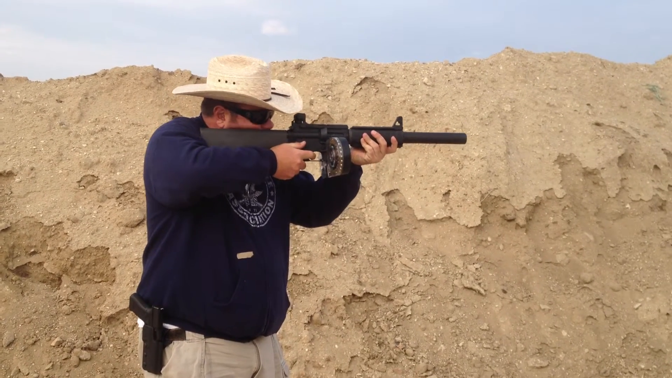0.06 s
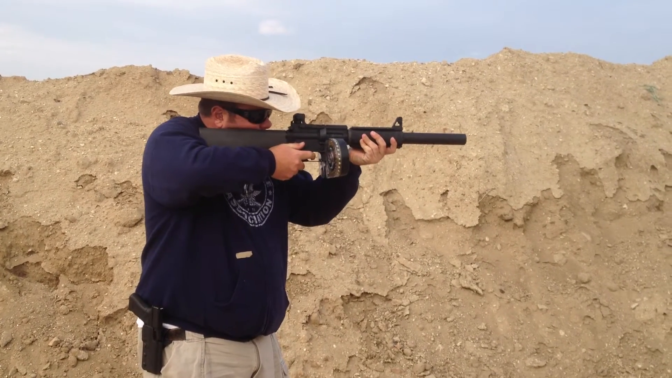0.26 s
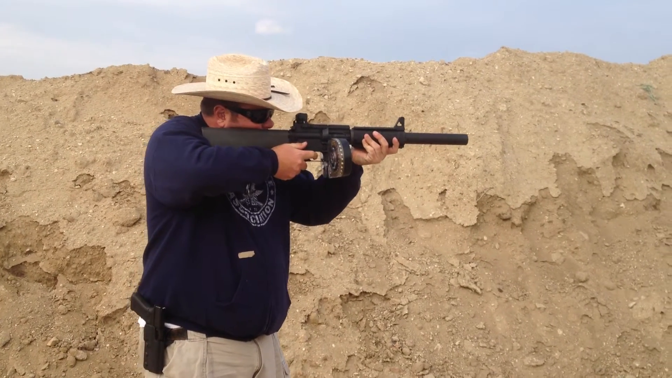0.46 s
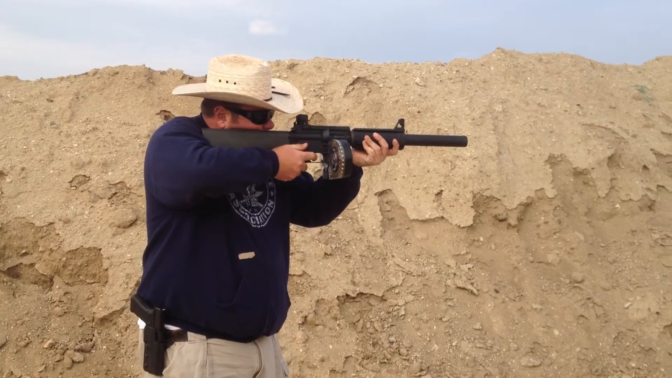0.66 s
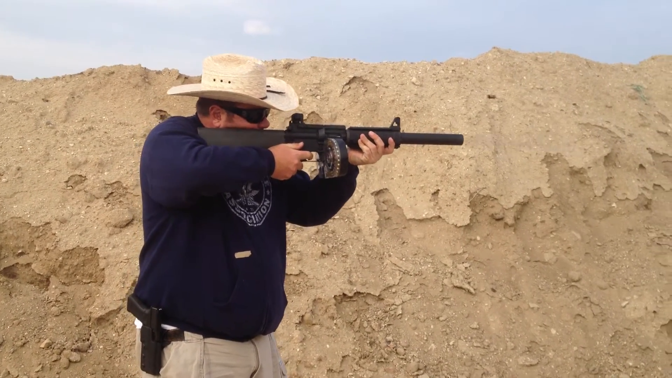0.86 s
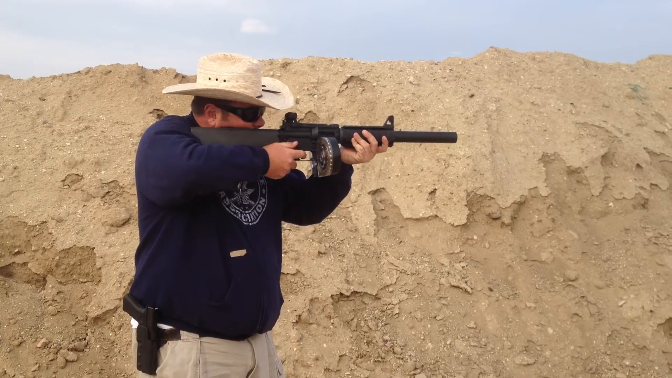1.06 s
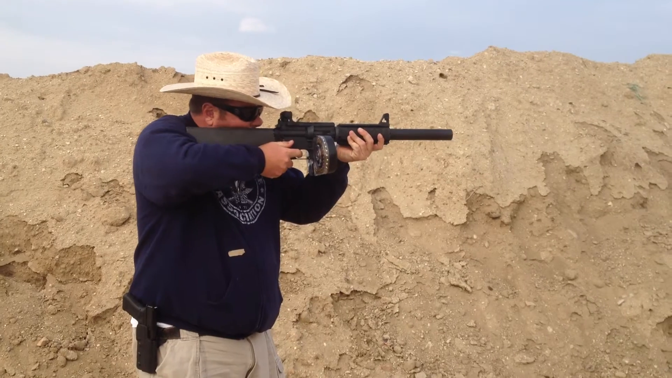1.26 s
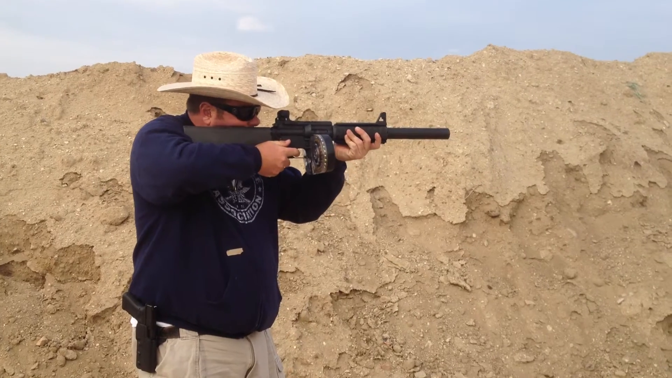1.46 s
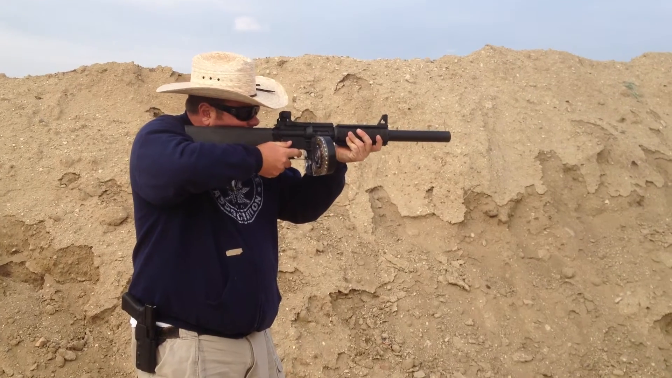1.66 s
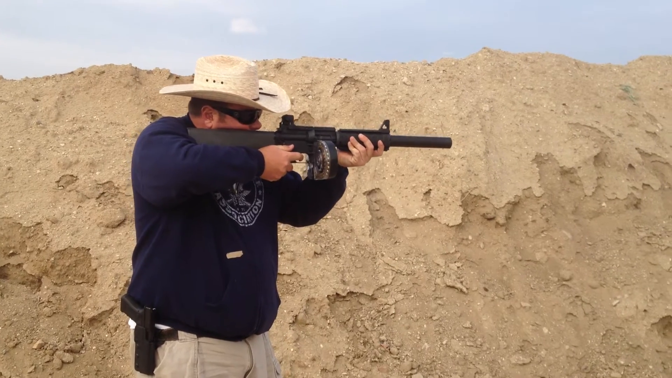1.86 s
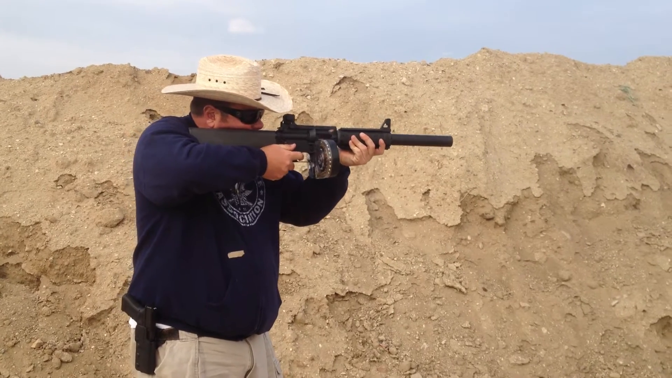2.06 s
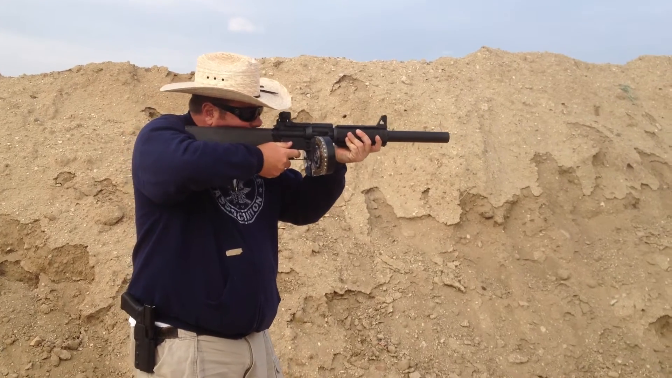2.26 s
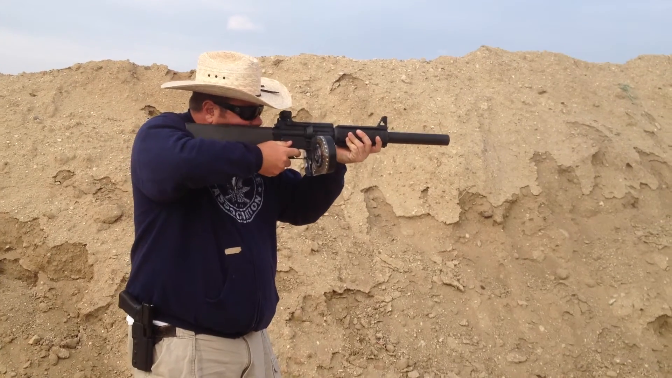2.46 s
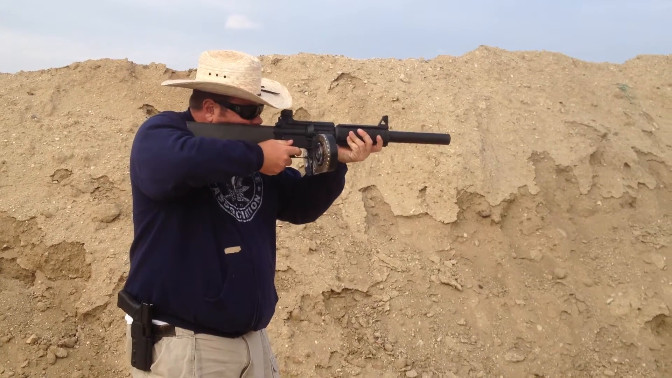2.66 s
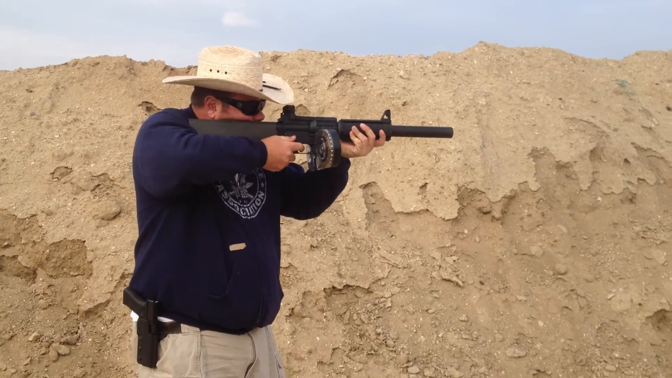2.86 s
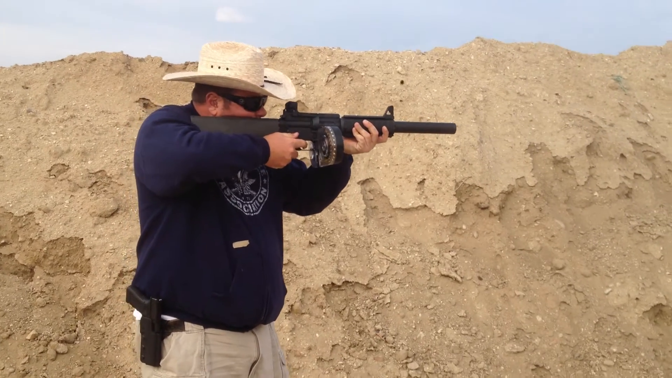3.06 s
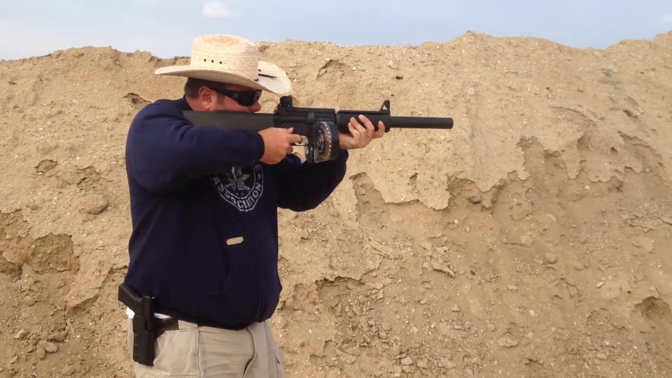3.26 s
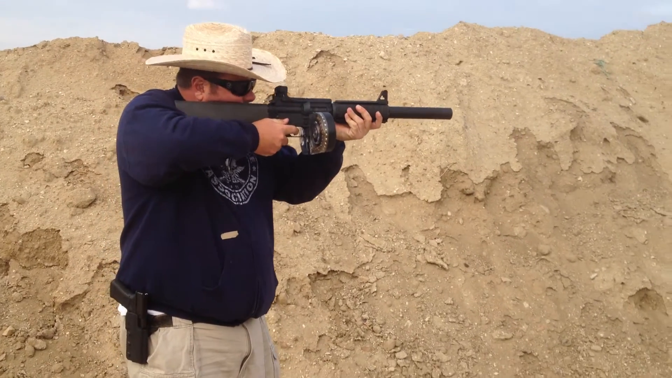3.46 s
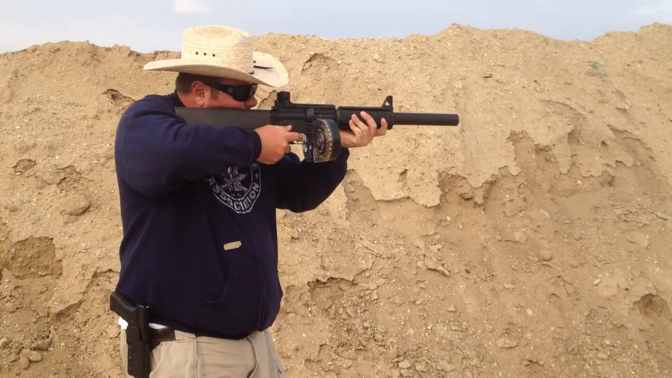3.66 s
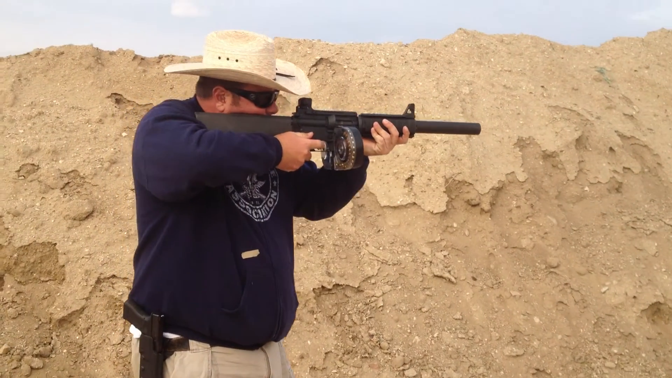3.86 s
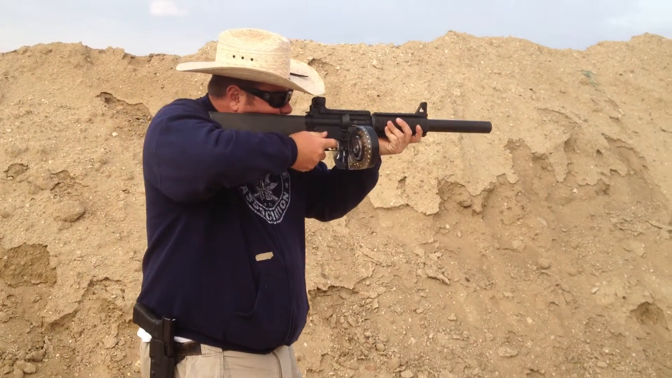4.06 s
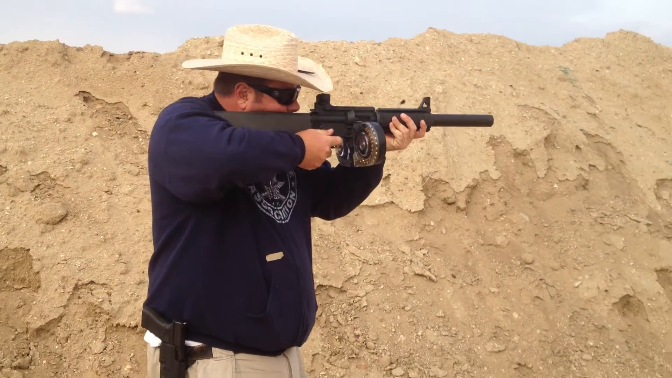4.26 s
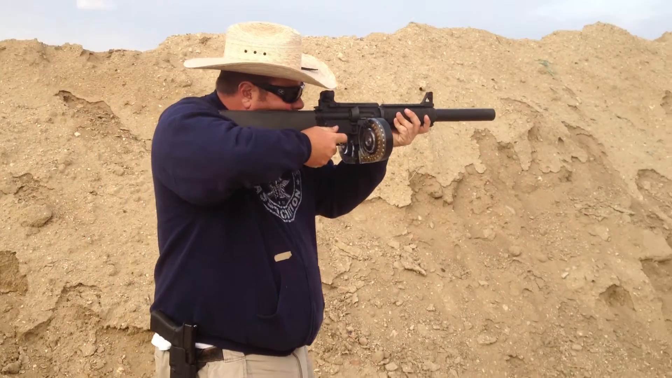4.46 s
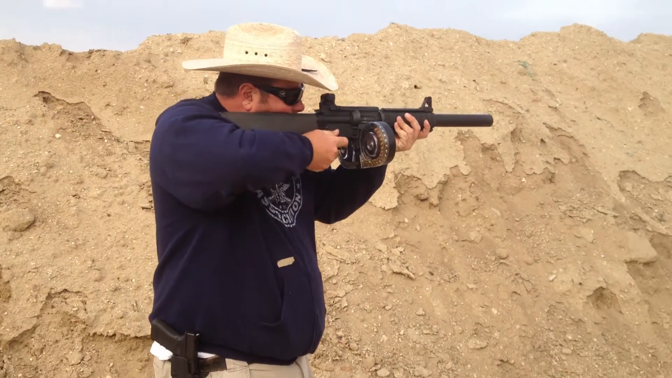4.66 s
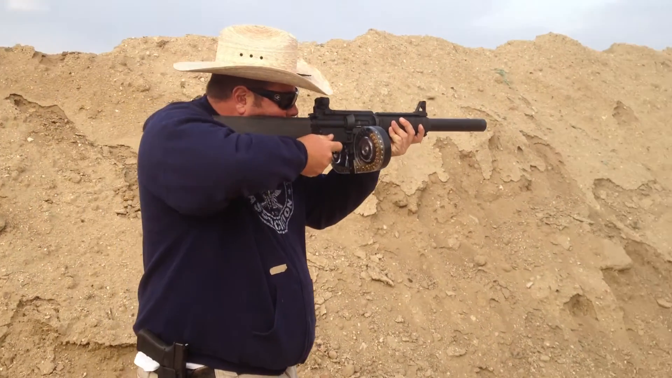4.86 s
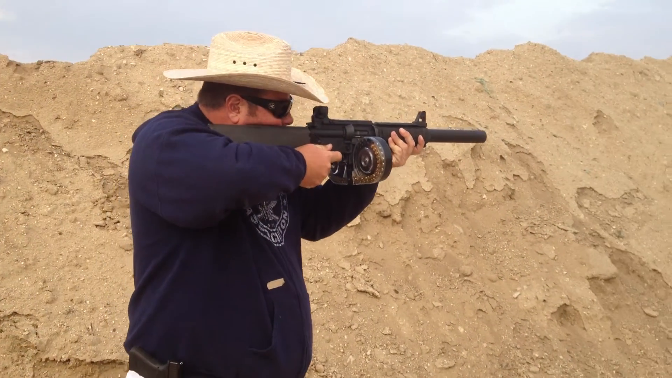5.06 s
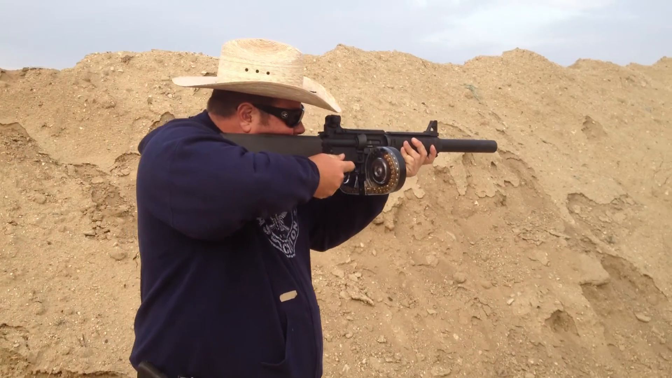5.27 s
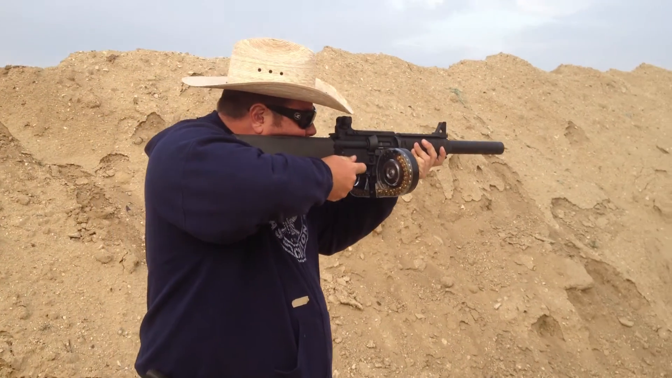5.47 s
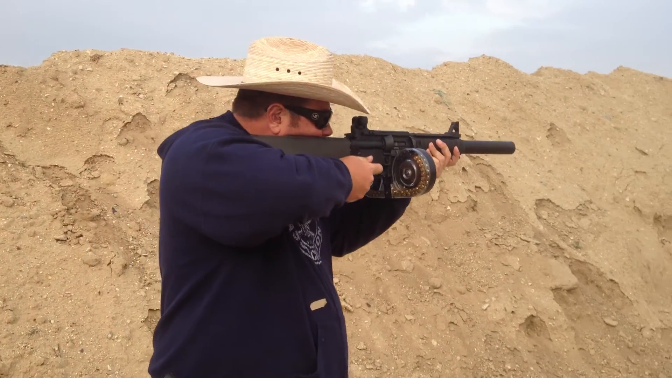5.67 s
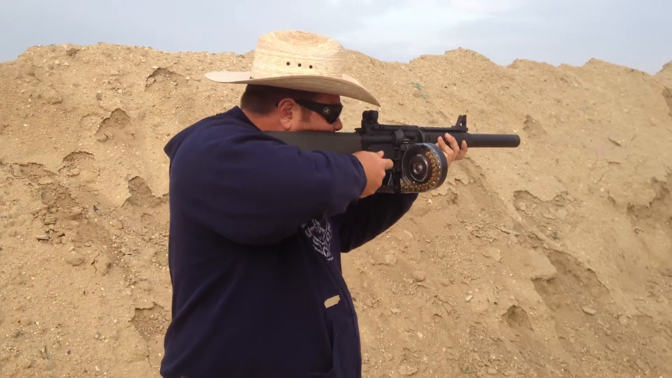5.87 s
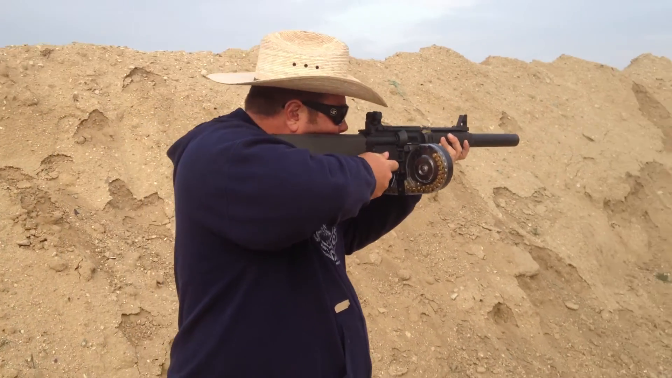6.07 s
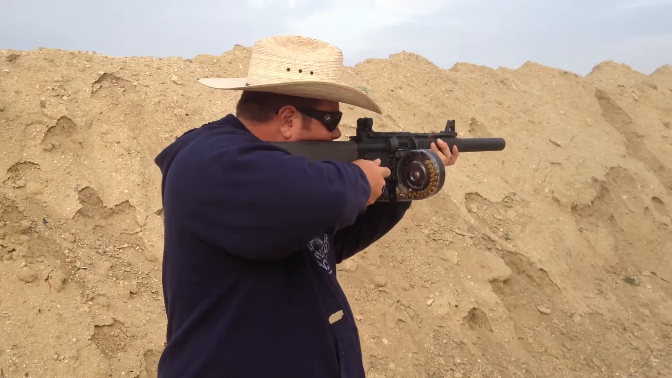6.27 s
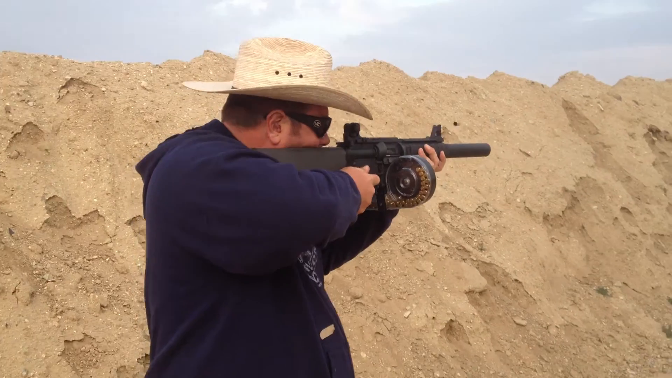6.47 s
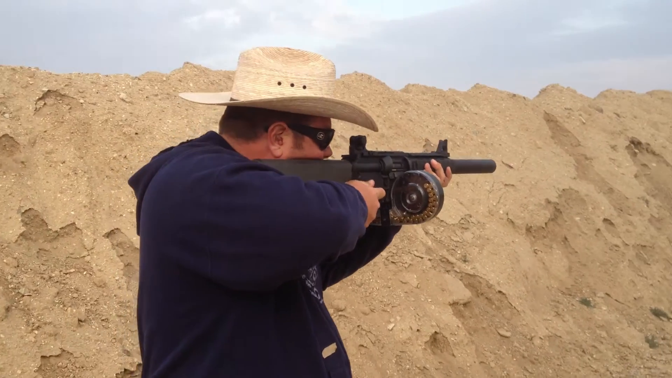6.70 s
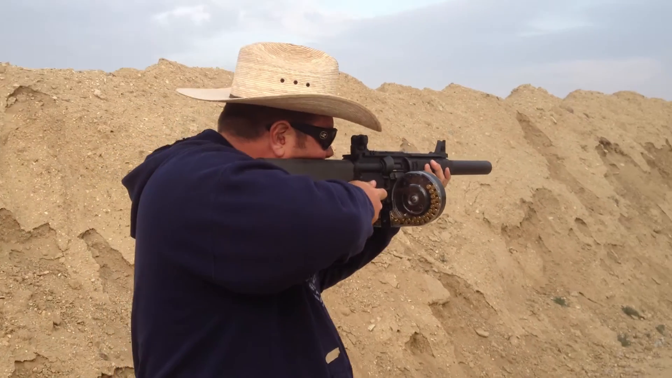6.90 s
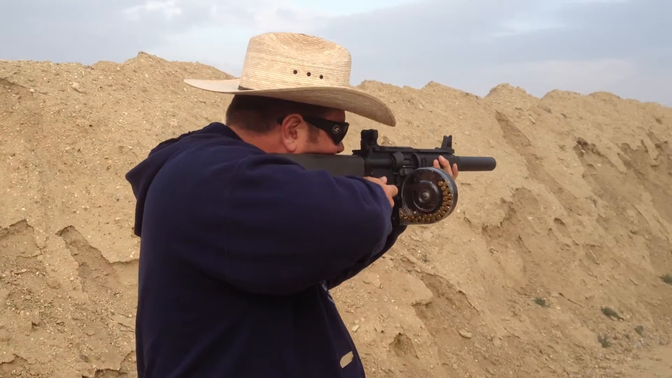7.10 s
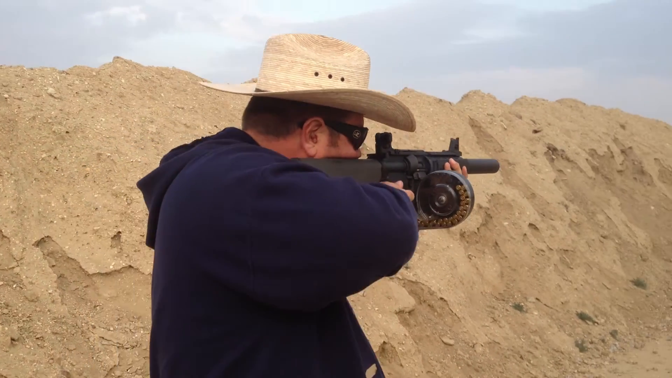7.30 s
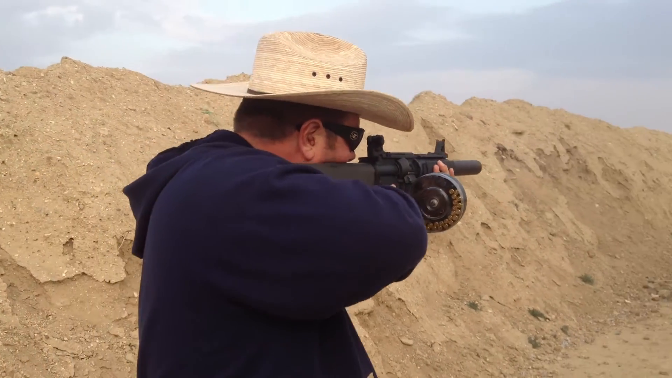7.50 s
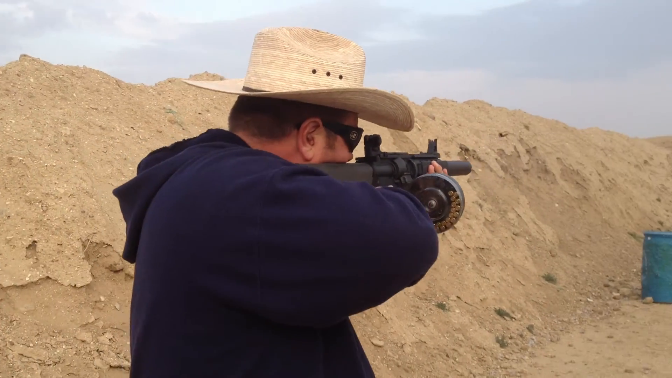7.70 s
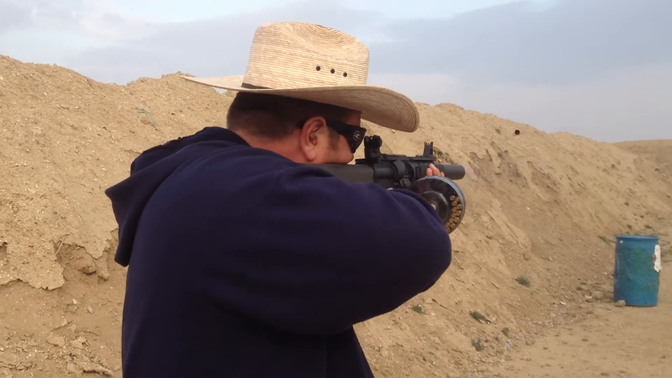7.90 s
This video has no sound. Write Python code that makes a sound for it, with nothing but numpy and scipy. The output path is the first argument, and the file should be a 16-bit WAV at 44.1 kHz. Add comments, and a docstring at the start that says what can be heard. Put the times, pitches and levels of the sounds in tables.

```python
"""Wind rumbles and an earlier shot's echoes die away; then a suppressed carbine fires strings of shots in an
earth-banked pit, heard from a point that moves round behind it. Each shot: hammer (struck steel modes), hissing blast
(decaying noise bands), the pop and its bank echoes (spread tone bursts), bolt home and settling, and bullet smacks.
In the pauses brass cases tinkle (ticks and beating tones), the ground knocks, boots scuff (swelling noise), sand
blows and far ground answers with a long grainy tail."""
import sys
import numpy as np
from scipy import signal
from scipy.io import wavfile
from scipy.ndimage import uniform_filter1d

SR = 44100
rng = np.random.default_rng(int(sys.argv[2]) if len(sys.argv) > 2 else 0)


def master(y):
    """Save y as 16-bit WAV."""
    cut = np.clip(np.atleast_2d(y).T, -1, 1)
    pcm = np.round(cut * 32767)  # scale
    wavfile.write(sys.argv[1], SR, pcm.astype(np.int16))


def nominal_scale(level):
    """Amplitude ratio for a level in decibels (scalar or array-like)."""
    x = np.asarray(level, float) / 20
    return 10 ** x


N = 350154
TIME = np.arange(N) / SR
BLAST_DB = -7.5  # reference level of every shot
EARLIER_SHOT_S = -.1635  # only its late echoes are still arriving

# the listening point's path: (time [s], share of the way behind [0 to about 1])
WALK = [(0, 0), (3, .15), (3.6, .3), (4.3, .55), (5.7, .85), (6.5, 1), (8, 1.03)]
# bolt and thump are loudest about two thirds of the way behind, settling from fully behind:
# (share of the way behind, relative bolt level [dB], relative settling level [dB], mean thump level [dB])
PORT = [(0, -19.5, -39, -28.5), (.2, -18.5, -42.5, -23), (.65, -17, -37.5, -22), (1.03, -20.5, -36, -29)]


def taps(s, db):
    """Impulse excitation: unit blows of the given levels at the given moments."""
    at = np.round(np.asarray(s) * SR).astype(int)
    return np.bincount(at, nominal_scale(db), N + SR)[:N]


def fade(x, t60):
    """Exponential decay: every blow leaves a tail falling 60 dB in t60 seconds."""
    return signal.lfilter([1], [1, -.001 ** (1 / (t60 * SR))], x)


def band(x, hz, width):
    """Resonance: a second-order peak of gain 1 at the centre."""
    return signal.lfilter(*signal.iirpeak(hz, hz / width, SR), x)


def above(x, hz):
    """High-pass filtering: the low end falls by 12 dB per octave."""
    return signal.sosfilt(signal.butter(2, hz, "high", fs=SR, output="sos"), x)


def ring(blows, modes):
    """Modal superposition: blows set off modes (frequency [Hz], relative level [dB], t60 [s])."""
    out = 0
    for hz, db, t60 in modes:
        width = np.log(1000) / np.pi / t60  # the faster the decay, the broader the resonance
        out = out + nominal_scale(db) * np.sqrt(t60 * SR) * band(blows, hz, width)
    return out


def hiss(tone):
    """Filtered turbulence: noise through twice-applied resonances (Hz, width Hz, relative dB), rms 1."""
    x = 0
    for hz, width, db in tone:
        noise = band(band(rng.standard_normal(N), hz, width), hz, width)
        x = x + nominal_scale(db) * np.sqrt(SR / width) * noise
    return x / np.std(x)


def wander(rate):
    """Random modulation: a new random value about rate times a second, joined by straight lines."""
    k = int(SR / rate)
    return uniform_filter1d(np.repeat(rng.standard_normal(N // k + 1), k), k)[:N]


def flicker(rate, depth_db):
    """Amplitude modulation by a wandering level."""
    return nominal_scale(depth_db * wander(rate))


def share_behind(s):
    """Geometry of the listening point: its share of the way behind the gun at given moments."""
    return np.interp(s, *np.transpose(WALK))


def add(out, s, burst):
    """Linear superposition: mix in a short burst centred on a moment."""
    at = int(s * SR) - len(burst) // 2 + np.arange(len(burst))
    inside = (at >= 0) & (at < N)
    out[at[inside]] += burst[inside]


def scatter(s, db):
    """Diffuse reflection: rough banks return each shot as a wash of noise."""
    # envelope of the wash: (delay after the shot [ms], relative level [dB])
    wash_decay = [(0, -27), (60, -22.5), (100, -36), (150, -44.5), (185, -42), (215, -40), (240, -50.5),
                  (270, -72), (400, -67), (600, -83)]
    # its colour: (frequency [Hz], width [Hz], relative level [dB])
    wash_tone = [(395, 450, -7), (880, 1000, -5), (1403, 410, 0.5), (2570, 500, -4.5), (2010, 2000, -1),
                 (3830, 990, -10.5), (7840, 5500, -9), (13000, 4000, -20)]
    ms, level_db = np.transpose(wash_decay)
    shape = nominal_scale(np.interp(np.arange(int(.6 * SR)) * 1000 / SR, ms, level_db))
    wash = signal.fftconvolve(taps(s, db), shape)[:N].clip(0)
    earlier_db = np.interp(1000 * (TIME - EARLIER_SHOT_S), ms, level_db, right=-200)
    wash = wash + nominal_scale(BLAST_DB + earlier_db)
    return wash * flicker(150, 4.3) * hiss(wash_tone) * nominal_scale(5.5)


def air(s, db):
    """Wind turbulence and reverberation: wind rumbles and blows sand; far ground returns a grainy tail."""
    # rumble, one list for each pause: (time [s], level [dB]);
    # it follows the wind, but its spike near 1.87 s is a short knock on the ground
    rumble_levels = [
        [(0.3, -57.5), (0.344, -70), (0.35, -66), (0.596, -67), (0.614, -61), (0.69, -54.5)],
        [(1.72, -62), (1.81, -70), (1.842, -73.5), (1.868, -61.5), (1.892, -74), (2.05, -68)],
        [(3.8, -49), (4.006, -47.5), (4.026, -68), (4.06, -41), (4.154, -47), (4.22, -42)],
        [(5.1, -49), (5.244, -51), (5.28, -47), (5.41, -52), (5.476, -45), (5.68, -47)],
        [(6.72, -57), (6.732, -76), (6.778, -55.5), (6.948, -57), (7.076, -51), (7.23, -50.5)],
    ]
    # wind and blown grit: (frequency [Hz], width [Hz], relative level [dB])
    wind_tone = [(133, 63, -0.5), (183, 150, 6), (263, 130, -8.5), (397, 190, -21)]
    grit_tone = [(680, 4400, 2), (2150, 470, -6.5), (3830, 290, -9.5)]
    # far echo: (frequency [Hz], width [Hz], relative level [dB])
    far_tone = [(600, 1200, -1), (1400, 550, -4), (2400, 700, 0), (3800, 1400, -10)]
    rumble_db = np.interp(TIME, *np.concatenate(rumble_levels).T)
    # the deep part grows faster than the rumble, the sand more slowly
    deep = nominal_scale(-67.5 + 1.4 * (rumble_db + 48.5))
    rumble = flicker(35, 2.0) * (nominal_scale(rumble_db) * hiss(wind_tone) + deep * hiss([(59.7, 41, 0)]))
    sand = nominal_scale(-69.5 + .5 * (rumble_db + 49))
    far_t60_s = 1.73
    far_power = fade(taps(s, 2 * (db - 49.5)), far_t60_s / 2)  # powers add
    far = np.sqrt(far_power.clip(0))
    coarse = sand * hiss(grit_tone) + far * flicker(8.1, 3.4) * hiss(far_tone)
    fine = np.hypot(nominal_scale(-15.5) * sand, nominal_scale(-13.5) * far)  # treble of both
    grains = nominal_scale(2.0) * coarse + nominal_scale(2.5) * fine * hiss([(7000, 4000, 1), (12500, 4000, -3.5)])
    return rumble + flicker(130, 3.5) * flicker(54, 1.5) * grains


def pop(spread_ms, db, tilt, bright_db):
    """Time dispersion: a pop spread into swelling tones, the lowest last, and a rough treble."""
    # tones: (frequency [Hz], lateness [spreads], length [spreads], relative level [dB])
    pop_tones = [(380, 2.0, 1.2, -10), (790, 1.376, 0.73, -7.5), (1060, .6, 1.2, -11),
                 (1451, -0.036, 0.68, -2), (1900, -.2, 0.38, -13.5), (2362, 0, 1.05, -17),
                 (3260, -.2, 0.31, -15), (3930, -.2, 0.23, -21)]
    ms = np.arange(-400, 400) * 1000 / SR
    treble = band(rng.standard_normal(len(ms)), 6000, 9000)
    out = nominal_scale(db - 24.5 + 2 * tilt) * np.exp(-.5 * (ms / spread_ms) ** 2) * treble
    for hz, late, longer, tone_db in pop_tones:
        size, pitch = rng.standard_normal(2)
        t = ms - late * spread_ms
        swell = np.exp(-.5 * (t / (longer * spread_ms)) ** 2)
        lift_db = bright_db * np.exp(-(np.log2(hz / 2400) / 0.34) ** 2)
        tilt_db = tilt * np.log2(hz / 1400)  # dB per octave
        tone = np.cos(2 * np.pi * hz * (1 + .03 * pitch) * t / 1000 + .5 * size)
        out += nominal_scale(db + tone_db + lift_db + tilt_db + 2.0 * size) * swell * tone
    return out


def pops_and_echoes(s, db):
    """Discrete reflection: direct pop, its ground bounce, a second burst of gas, then the bank echoes."""
    # these bursts in that order: (delay from the side [ms], delay from behind [ms])
    burst_ms = [(.1, .1), (1.4, 1.4), (5.2, 5.6), (12, 18), (29, 32), (43.6, 47), (56.3, 60.4),
                (86.5, 90.6), (166.9, 170.7), (302, 306)]
    # the same bursts: (spread [ms], treble tilt [dB per octave], relative level from the side [dB],
    # relative level from behind [dB], full gain of the bright tone [dB])
    bursts = [(.3, 2.5, -0.5, -6, -1.5), (0.27, 3.5, -6, -7.5, -3), (1.2, 6, -5.5, -11.5, 5.5),
              (1.2, 4, -15.5, -9.5, 14.5), (1.1, 2, -10, -16.5, 3.5), (1.3, 1.5, -9, -10, -6),
              (0.95, 3.55, -7, -8, 5), (1.25, -7, -25, -26, 26.5), (0.95, 2.5, -14, -16.5, 15),
              (0.81, -4.5, -44, -43, -1)]
    # course of the bright tone, which rises until 6.5 s, then sinks: (time [s], share of its full gain)
    bright_share = [(0, 0), (3.4, 0.057), (3.8, 0.38), (4.6, 0.56), (5.0, 0.64), (5.9, .75), (6.5, 0.91),
                    (7.3, 0.68), (7.9, 0.7)]
    # a late dull echo, heard when no shot covers it: (time [s], relative level [dB])
    late_echoes = [(0.252, -22.5), (1.676, -24.5), (3.783, -26.5), (5.067, -32), (5.076, -26), (6.698, -24)]
    out = np.zeros(N)
    for t, d, behind, bright in zip(s, db, share_behind(s), np.interp(s, *np.transpose(bright_share))):
        for (side_ms, rear_ms), (spread, tilt, side_db, rear_db, bright_db) in zip(burst_ms, bursts):
            level_db = d + 8 + side_db + behind * (rear_db - side_db)
            delay_ms = side_ms + behind * (rear_ms - side_ms)
            add(out, t + delay_ms / 1000, pop(spread, level_db, tilt, bright * bright_db))
    for t, d in late_echoes:
        add(out, t + 0.00048, pop(0.72, d - 3, -5.2, 0))
    return out


def smacks():
    """Impact: the bullet strikes the far bank with a bright resonant slap and a decaying spray of dirt."""
    # smacks not hidden by the next shot: (time [s], relative level [dB])
    strikes = [(0.018, -18.5), (0.2107, -19.5), (1.445, -26), (1.634, -18.5), (2.99, -24), (3.554, -24.5),
               (3.733, -28), (3.7457, -22.5), (4.65, -24), (4.8427, -22), (5.0411, -17), (5.9154, -14.5),
               (6.2863, -15), (6.6546, -20.5), (7.4625, -27), (7.6831, -21), (7.8794, -17)]
    # (frequency [Hz], width [Hz], relative level [dB])
    smack_tone = [(2050, 1400, 7), (3900, 730, 3.5), (7540, 2400, 5), (12000, 3900, -4.5)]
    blows = taps(*np.transpose(strikes))
    slap = sum(nominal_scale(db + 9.5) * band(band(blows, hz, w), hz, w) for hz, w, db in smack_tone)
    spray = nominal_scale(5) * fade(blows, 0.0078) + nominal_scale(-23.5) * fade(blows, 0.12)
    return slap + spray * hiss(smack_tone)


def action(s, home_ms, settle_ms):
    """Modal excitation: hammer, firing, bolt home and rebound each rattle the same steel for a few ms."""
    # receiver and bolt: (frequency [Hz], relative level [dB], t60 [s])
    steel = [(860, -9, .014), (1590, -9, .014), (2550, -4, .008), (3250, -2.5, .006), (4050, -4, .01),
             (7640, -10, .015), (8500, -10, .012), (12700, -12, .01), (13900, -12, .012)]
    # thin tube on the muzzle: (frequency [Hz], relative level [dB], t60 [s])
    can = [(6740, -18, .26), (6975, -13, .22), (7080, -23, 0.2)]
    way, bolt_level, settle_level, _ = np.transpose(PORT)
    bolt_db = np.interp(share_behind(s), way, bolt_level) + 2.25 * rng.standard_normal(len(s))
    settle_db = np.interp(share_behind(s), way, settle_level) + 2 * rng.standard_normal(len(s))
    db = np.full(len(s), BLAST_DB)
    hammer = fade(taps(s - .0055, db - 22.5), .012)
    firing = fade(taps(s, db - 8.0), 0.011)
    home = fade(taps(s + home_ms / 1000, bolt_db), 0.041)
    settle = fade(taps(s + settle_ms / 1000, settle_db), 0.016)
    noise = rng.standard_normal(N) * flicker(700, 0.81)
    rattle = (hammer + firing + nominal_scale(8.5) * home + nominal_scale(12.5) * settle) * noise
    # the shooter's body hides the tube from behind
    tube = nominal_scale(-4 - 12 * share_behind(TIME)) * ring(home * noise, can)
    return nominal_scale(-15.0) * ring(rattle, steel) + nominal_scale(-8) * band(rattle, 12000, 9000) + tube


def gas(s, db):
    """Jet turbulence: gas roars out of can and port, full flow for some ms, then a sputtering fade by band."""
    # escaping gas: (frequency [Hz], width [Hz], relative level from the side [dB], t60 [s])
    gas_bands = [(179, 57, -23, 0.11), (262, 130, -14.5, 0.096), (552, 350, -5, 0.1), (817, 290, -14, 0.32),
                 (1690, 690, -10.5, 0.16), (2478, 700, -5, 0.14), (3180, 720, -8.5, 0.17),
                 (3980, 1300, -6.5, 0.12), (6200, 4500, -9, 0.13), (7820, 2600, -11.5, 0.2),
                 (10960, 2000, -27, 0.28), (13060, 4100, -10.5, .16)]
    # change when heard from behind: (frequency [Hz], level change [dB])
    gas_behind = [(190, 5.5), (380, -6.5), (700, 1), (1400, 3.5), (2500, 0), (8000, 1.5), (14000, 1)]
    blows = uniform_filter1d(taps(s, db), size=50, origin=-5)  # pressure builds within about a ms
    full_flow = signal.windows.tukey(640, .3)[320:]
    rush = nominal_scale(-8.5) * signal.fftconvolve(blows, full_flow)[:N].clip(0)
    sputter = flicker(600, 2)
    behind = share_behind(TIME)
    at_hz, change_db = np.transpose(gas_behind)
    out = 0
    for hz, width, level_db, t60 in gas_bands:
        turn_db = behind * np.interp(np.log(hz), np.log(at_hz), change_db)
        out = out + nominal_scale(level_db + turn_db) * (fade(blows, t60) + rush) * hiss([(hz, width, 0)])
    return sputter * out


def thump(s):
    """Monopole pulse: the port vents a one-sided push of air at each shot, then a short low swing."""
    way, *_, level_db = np.transpose(PORT)
    db = np.interp(share_behind(s), way, level_db) + 2 * rng.standard_normal(len(s))
    t = TIME[:SR // 5]
    push_ms, swing_after_ms, swing_hz, swing_t60_s = 9.7, 7, 140, 0.024
    late = (t - swing_after_ms / 1000).clip(0)
    push = np.sin(np.pi * (1000 * t / push_ms).clip(0, 1)) ** 2
    swing = nominal_scale(-5.5 - 60 * late / swing_t60_s) * np.sin(-2 * np.pi * swing_hz * late)
    return signal.fftconvolve(taps(s, db), push + swing)[:N]


def cases():
    """Impact and beating: a tick on the dirt, then spinning brass sings two close, wavering tones."""
    # ticks and rings, of landing cases except for a faint stray tick at 6.72 s:
    # (time [s], relative low tick level [dB], relative high tick level [dB], ring level [dB])
    ticks = [(0.409, -33.5, -45, -52.5), (0.5825, -45, -39, -55.5), (0.689, -51.5, -55, -56.5),
             (1.6644, -24, -43.5, -54), (1.857, -32, -45, -46.5), (1.973, -44.5, -37.5, -68.5),
             (2.061, -43, -54, -60.5), (3.76, -38, -37, -58), (3.875, -62, -58, -65),
             (3.9394, -43, -38.5, -59), (4.1344, -32, -38.5, -52), (5.2277, -46, -49, -56),
             (5.308, -55, -59, -67), (5.3258, -45, -54, -72), (5.354, -45, -43.5, -52),
             (5.4165, -46, -49.5, -75), (5.443, -27.5, -39, -56), (5.4628, -61, -45, -64),
             (5.5538, -16.5, -40, -58.5), (5.609, -44, -45, -63), (5.6186, -42, -46, -51.5),
             (6.7224, -43, -45, -60), (6.8277, -39, -46, -56), (7.0167, -48, -56, -65.5),
             (7.037, -34.5, -52, -63), (7.228, -38, -47, -54)]
    s, low_db, high_db, _ = np.transpose(ticks)
    out = fade(taps(s, low_db - 4.5), 0.01) * hiss([(2050, 690, -1.5), (4970, 2000, -13.0)])
    out = out + fade(taps(s, high_db), 0.011) * hiss([(8100, 4200, -4.5), (12700, 6000, 4)])
    t = TIME[:SR // 3]
    shift_hz = 45 * wander(22)
    waver = flicker(50, 5) * np.exp(2j * np.pi * np.cumsum(shift_hz) / SR)
    t60_s = .32
    for start, _, _, db in ticks:
        split, phase, pitch = rng.random(3)
        hz = 10380 + 60 * (2 * pitch - 1)
        beat_hz = 60 + 100 * split
        beating = 1 + 0.66 * np.exp(-2j * np.pi * (beat_hz * t + phase))
        pair = np.exp(2j * np.pi * hz * t) * beating
        i = int(start * SR)
        out[i:i + len(t)] += nominal_scale(db - 60 * t / t60_s) * (pair * waver[i:i + len(t)]).imag
    return out


def knocks():
    """Damped impact: short dull bursts of earth."""
    # knocks on the ground: (time [s], level [dB], t60 [s])
    ground_blows = [(1.75, -51, .03), (1.865, -40.5, 0.019), (4.11, -27, 0.015), (4.117, -55, 0.024),
                    (4.224, -60, 0.028), (5.16, -51, .03), (5.551, -24, 0.04), (5.56, -28, 0.014),
                    (5.557, -31.5, 0.22), (5.662, -48, 0.021), (6.763, -56, .03), (6.774, -53, 0.044),
                    (6.802, -42, .03), (7.003, -46, .04)]
    body = hiss([(685, 900, 5.5), (1610, 1600, 1), (3500, 1200, -21.5), (8000, 4000, -27.5)])
    return body * sum(fade(taps([s], [db]), t60) for s, db, t60 in ground_blows)


def scuffs():
    """Sliding friction: each scuff of a boot swells and dies as flickering, grainy noise."""
    # boots on the dirt: (start [s], length [s], level [dB])
    slides = [(3.915, 0.074, -55), (4.037, 0.089, -50), (4.168, 0.067, -64), (5.494, 0.097, -58),
              (5.599, 0.12, -60), (6.8, 0.24, -70), (6.998, .08, -65)]
    swell = 0
    for start, length, db in slides:
        swell = swell + nominal_scale(db) * np.sin(np.pi * ((TIME - start) / length).clip(0, 1)) ** 2
    return swell * flicker(200, 5.1) * hiss([(1000, 1170, 0), (2500, 1500, 0.5), (8000, 6000, -13)])


def scene():
    """Superposition of gun, banks, ground and air."""
    # (time of the shot [s], bolt home after [ms], carrier settles after [ms])
    shots = [(0.0289, 63.6, 153), (0.7387, 61.6, 97), (0.9172, 63.9, 105), (1.0901, 61.1, 76),
             (1.2642, 62.9, 96), (1.4494, 61.8, 160), (2.098, 62, 130), (2.2718, 61.8, 130),
             (2.4483, 60.6, 115), (2.6252, 60.3, 100), (2.8079, 64.4, 130), (2.9969, 63.2, 128.5),
             (3.19, 60.9, 126), (3.372, 62, 140), (3.5618, 62.3, 150), (4.2735, 60.5, 122),
             (4.4626, 59.9, 115), (4.6582, 59.4, 120), (4.8563, 61.1, 121), (5.7291, 60.3, 122),
             (5.918, 61.6, 116), (6.0989, 60.2, 121), (6.2898, 63.7, 110), (6.4681, 60.9, 125),
             (7.2784, 68, 138), (7.4958, 60.5, 102), (7.6937, 59.3, 135), (7.8929, 57.5, 170)]
    columns = np.transpose(shots)
    s = columns[0]
    db = np.full(len(s), BLAST_DB)
    pops = pops_and_echoes(np.append(s, EARLIER_SHOT_S), np.append(db, BLAST_DB))
    gun = gas(s, db) + thump(s) + above(action(*columns) + pops, 132) + scatter(s, db)
    ground = above(smacks(), 700) + cases() + knocks() + scuffs()
    return (gun + ground + above(air(s, db), 45))[None]


def low_pass(x):
    """Removes everything above the highest recorded frequency."""
    return signal.sosfilt(signal.butter(12, 16470, fs=SR, output="sos"), x)


def record(dry):
    """Saturation: the microphone loses its top and overloads; the converter cuts what the overload adds."""
    capsule = signal.ellip(10, .2, 70, 15400, fs=SR, output="sos")
    converter = signal.ellip(10, .2, 70, 16400, fs=SR, output="sos")
    overloaded = 0.66 * np.tanh(signal.sosfilt(capsule, dry) / 0.8)
    return low_pass(signal.sosfiltfilt(converter, overloaded))


dry = scene()
out = record(dry)
master(out)
```